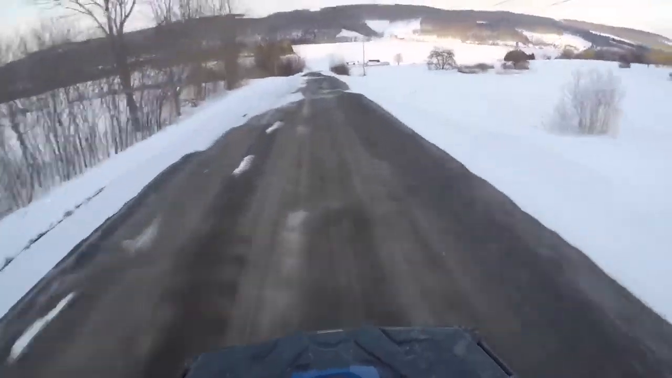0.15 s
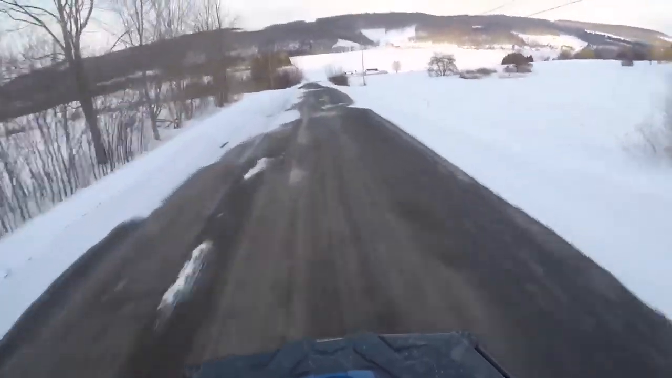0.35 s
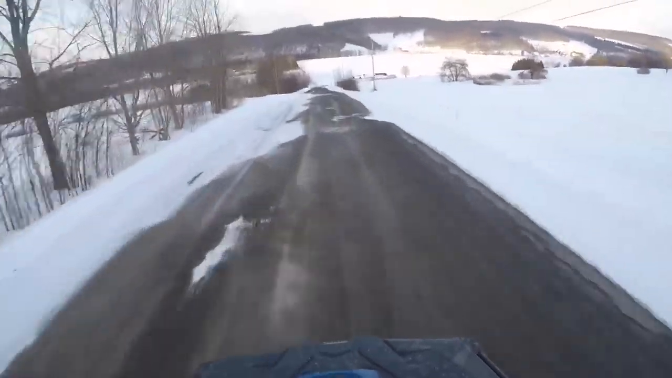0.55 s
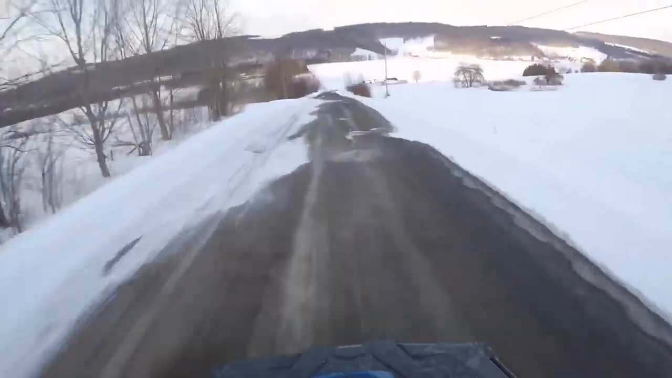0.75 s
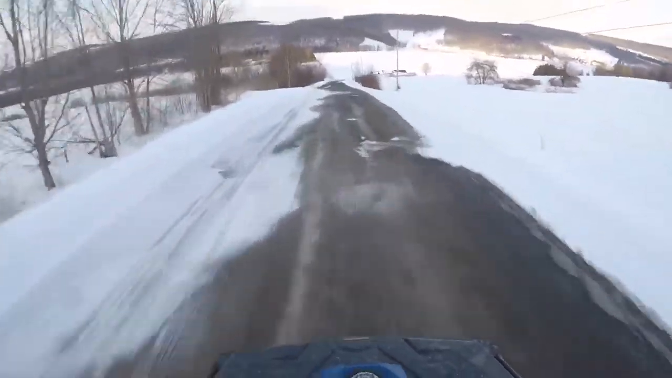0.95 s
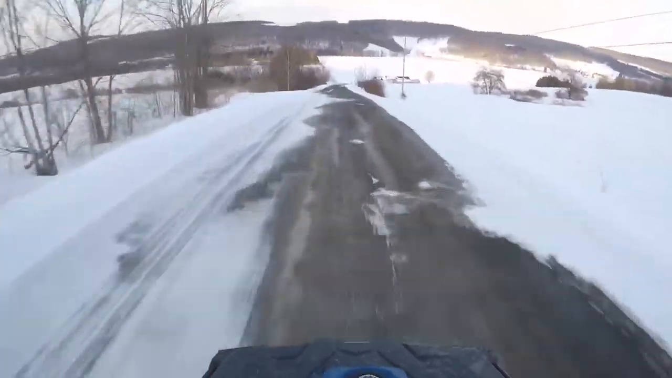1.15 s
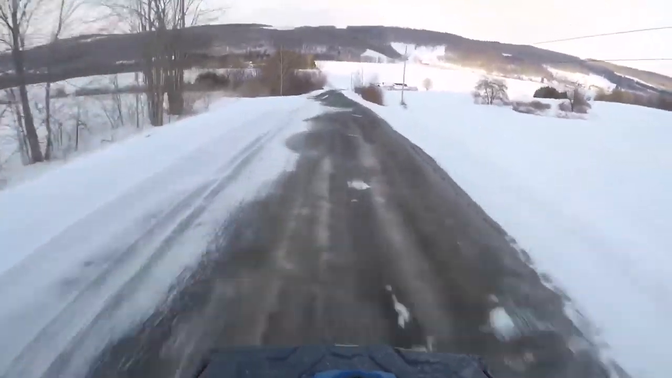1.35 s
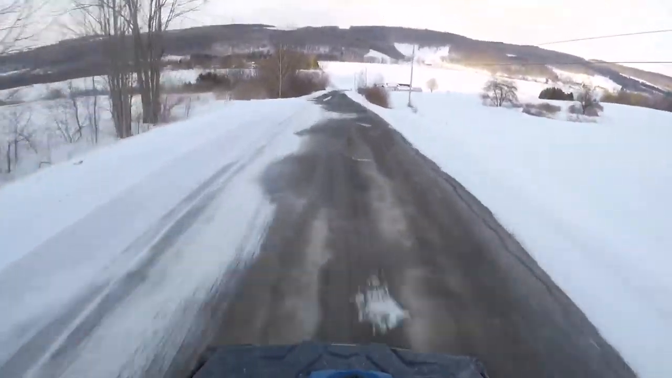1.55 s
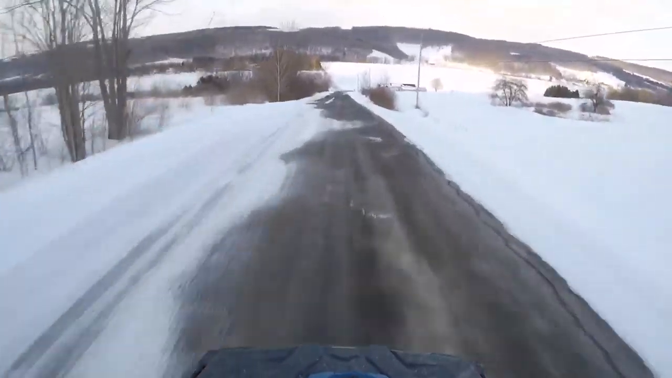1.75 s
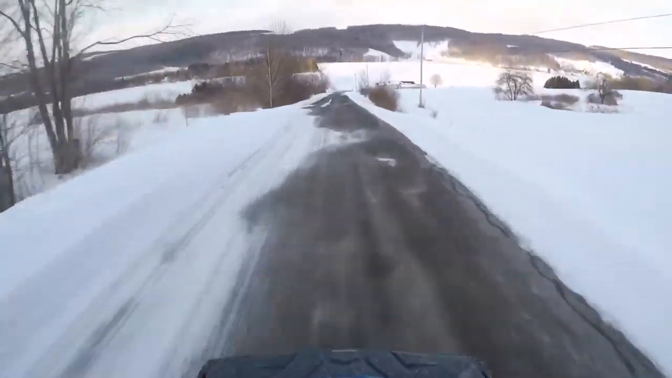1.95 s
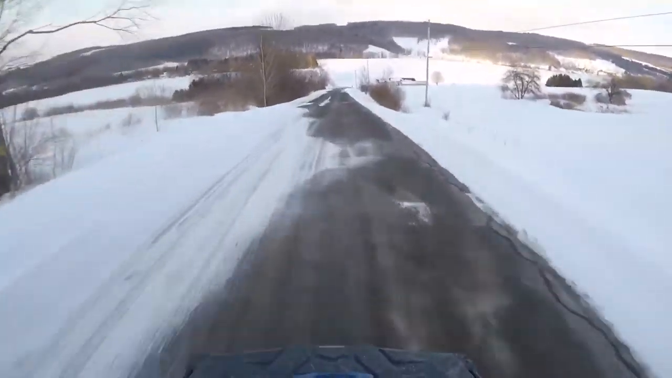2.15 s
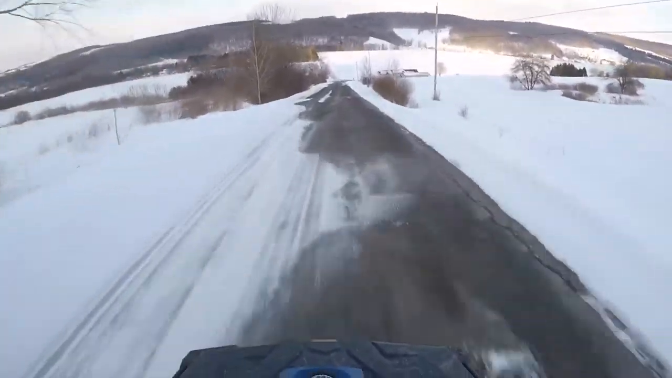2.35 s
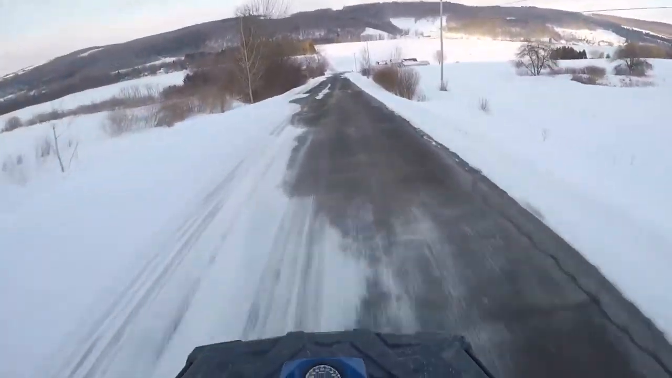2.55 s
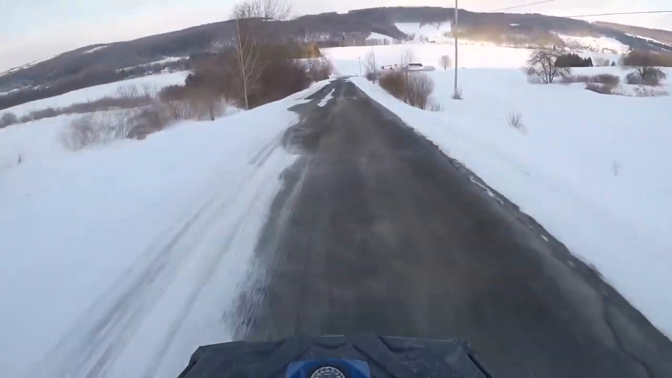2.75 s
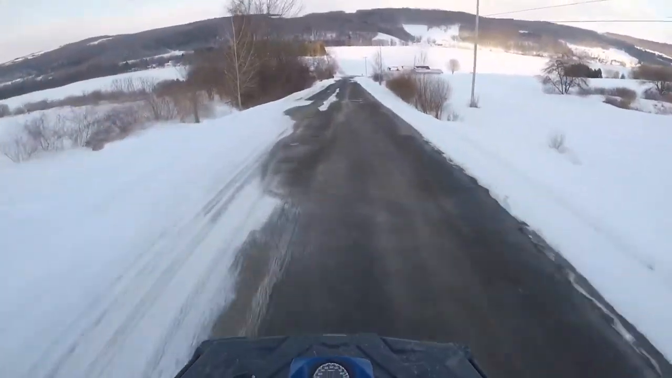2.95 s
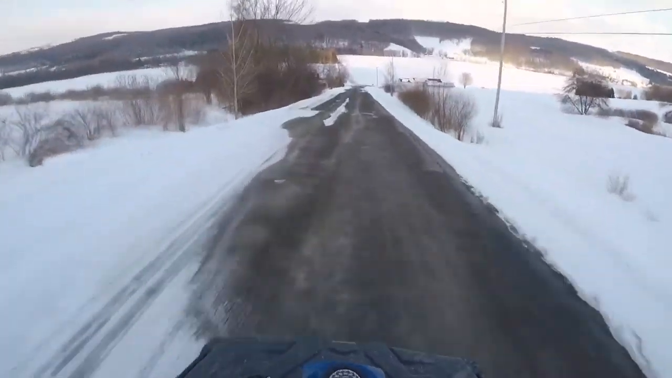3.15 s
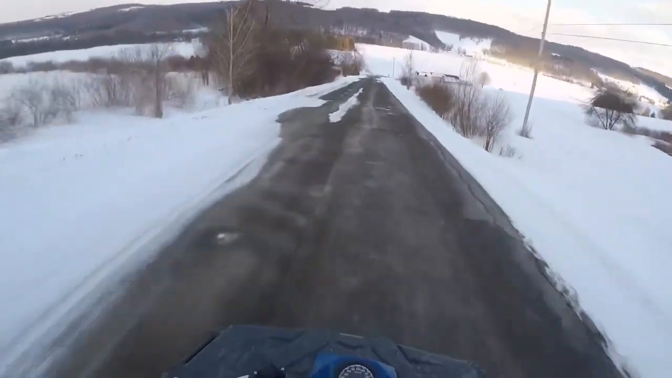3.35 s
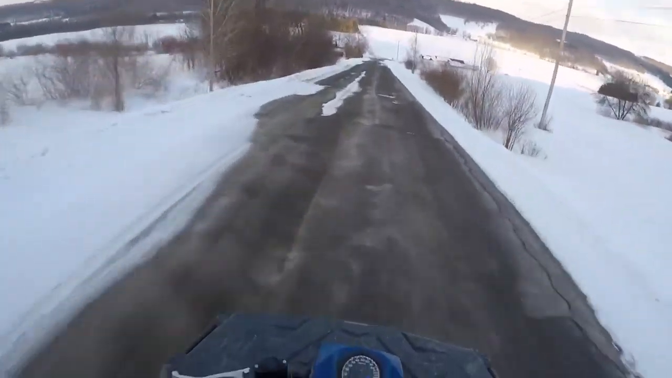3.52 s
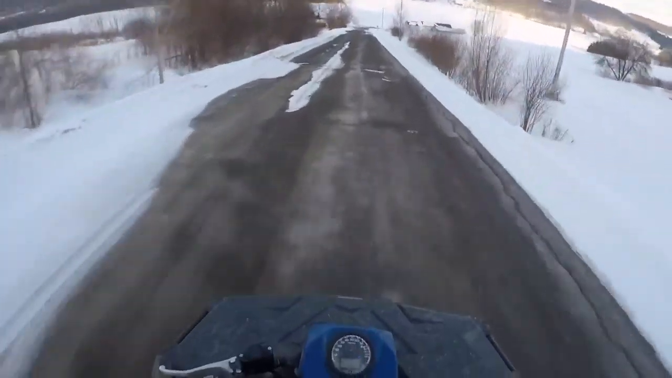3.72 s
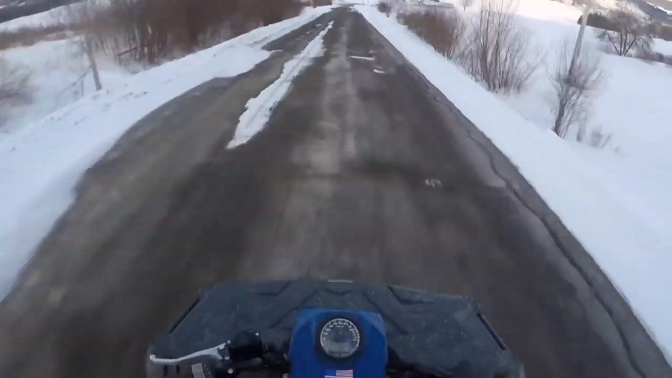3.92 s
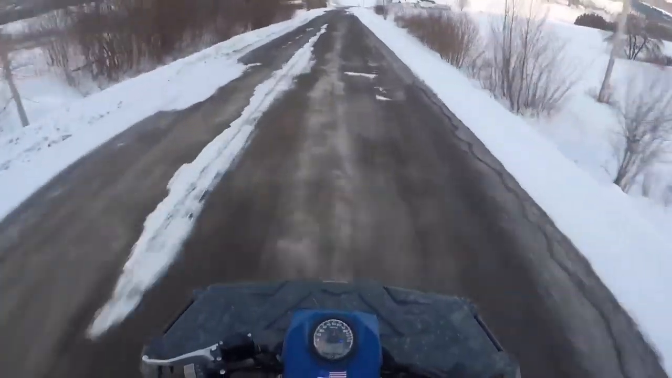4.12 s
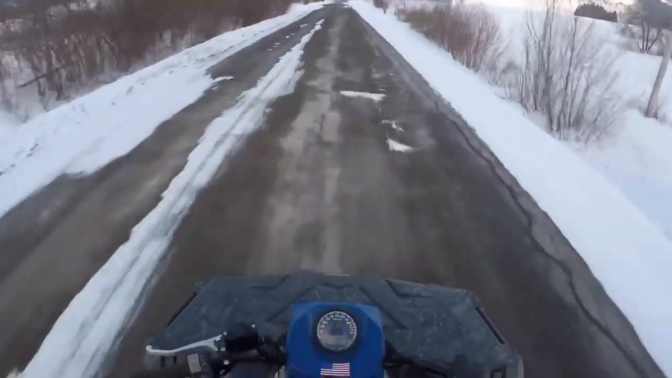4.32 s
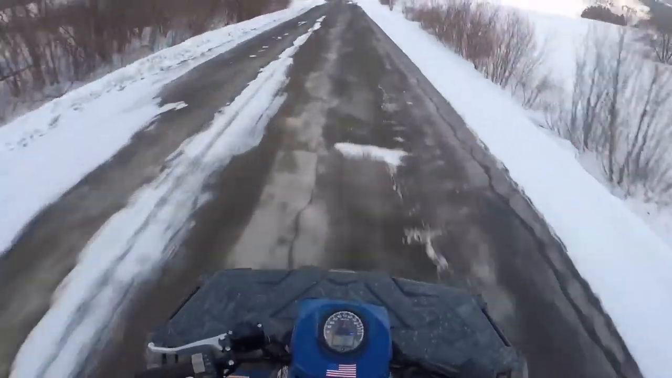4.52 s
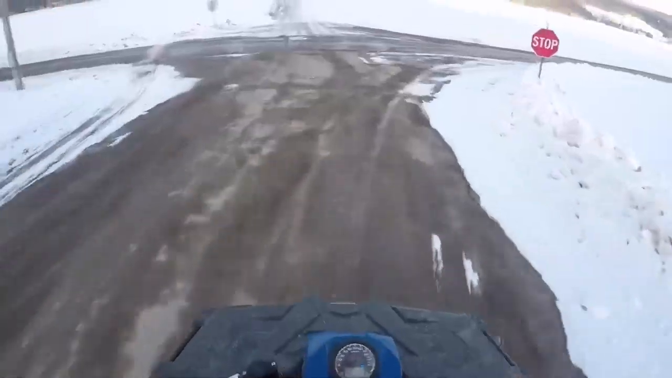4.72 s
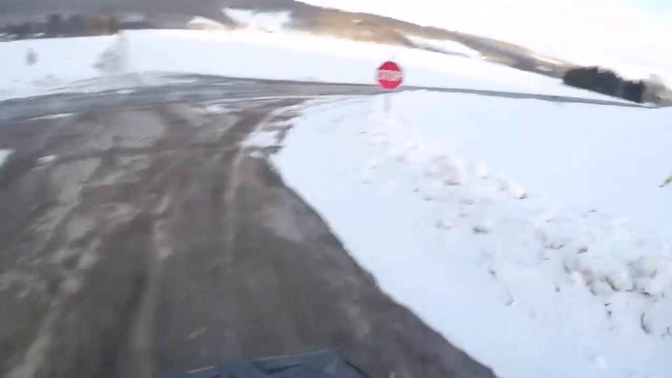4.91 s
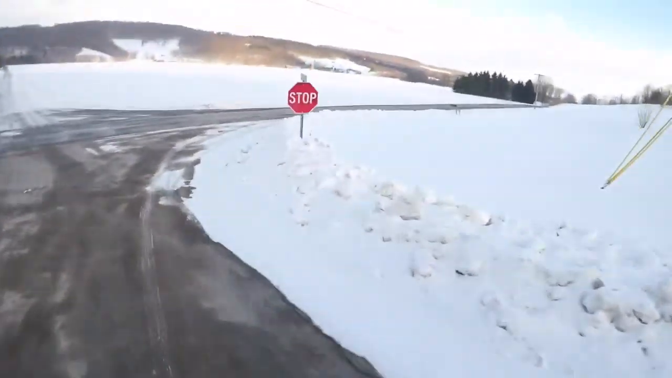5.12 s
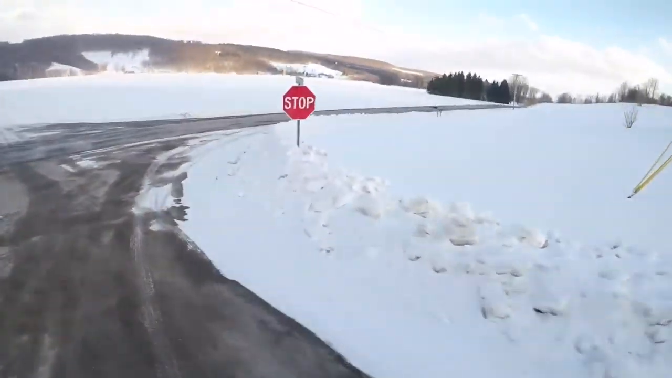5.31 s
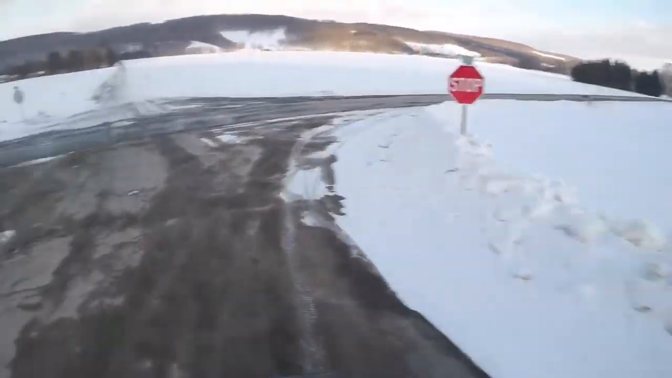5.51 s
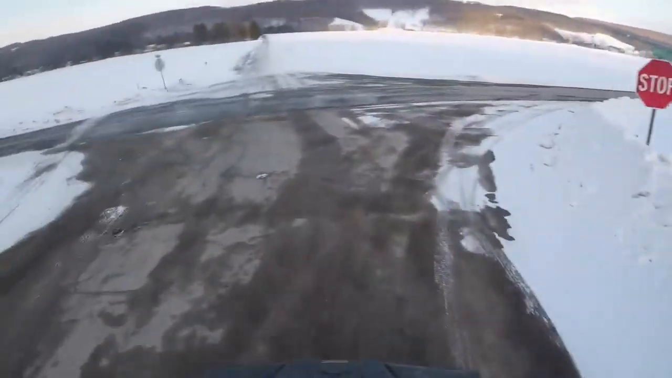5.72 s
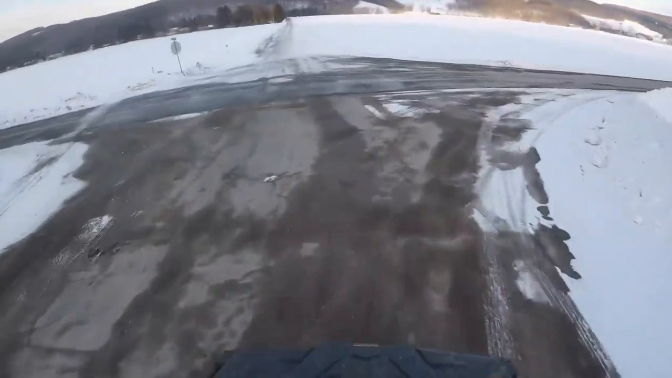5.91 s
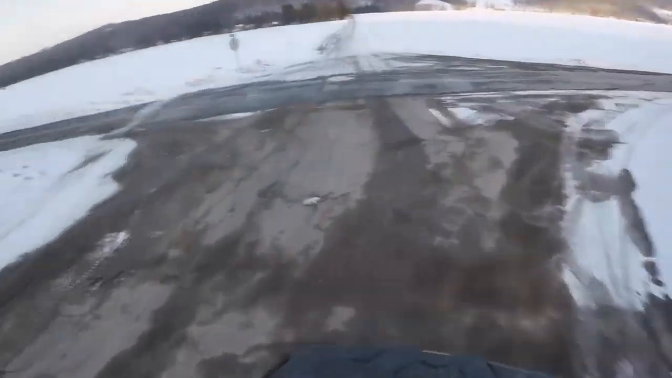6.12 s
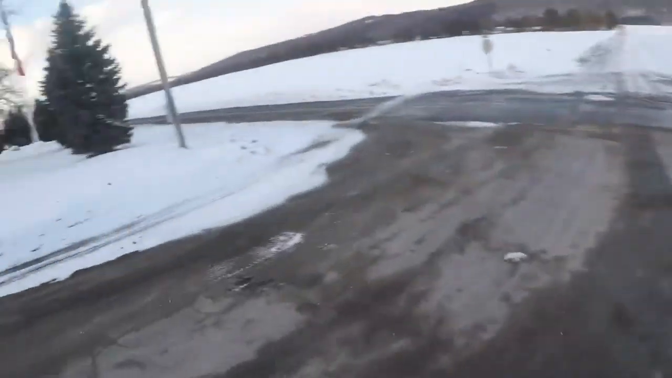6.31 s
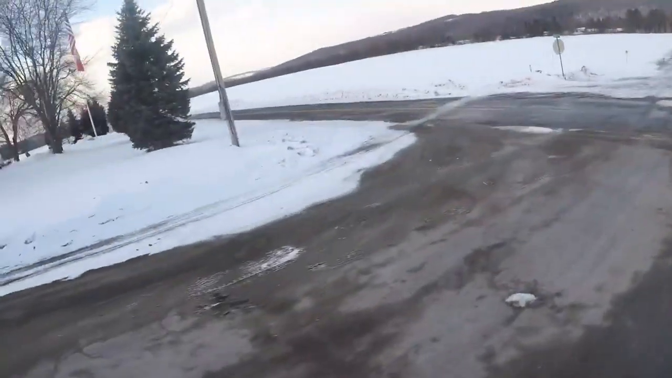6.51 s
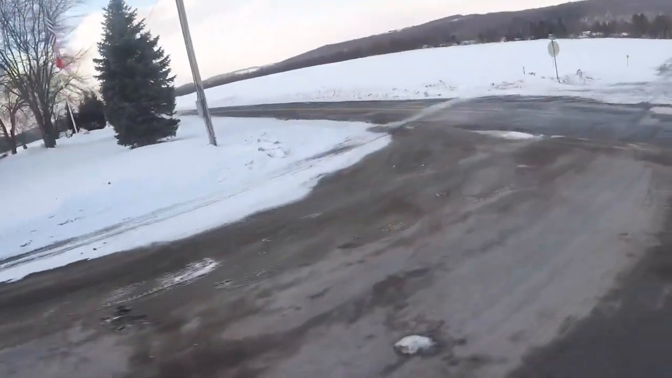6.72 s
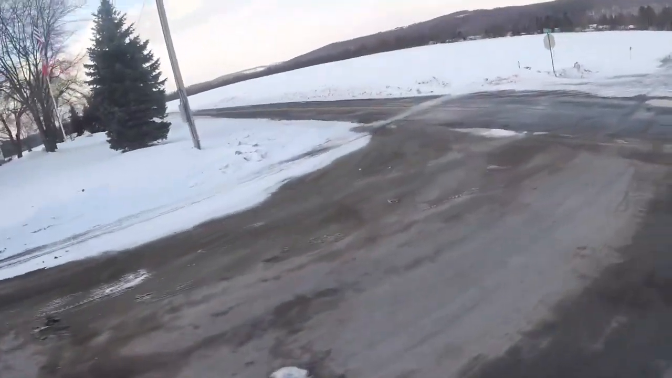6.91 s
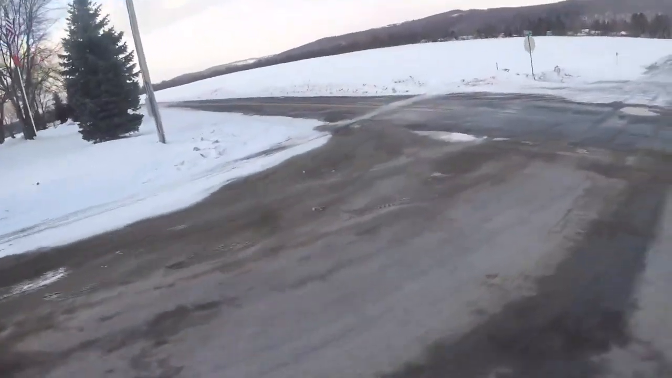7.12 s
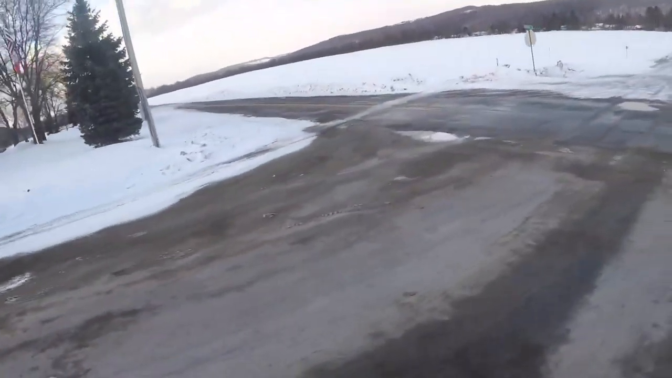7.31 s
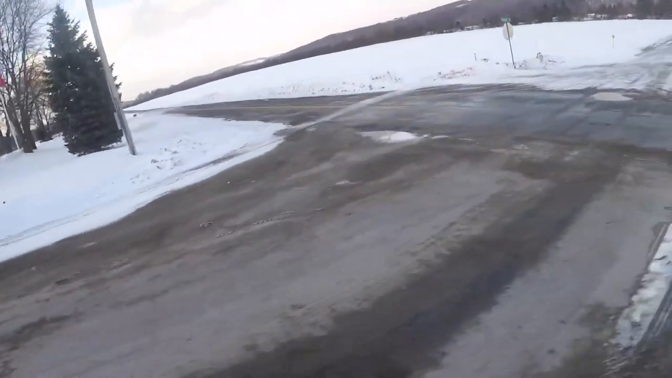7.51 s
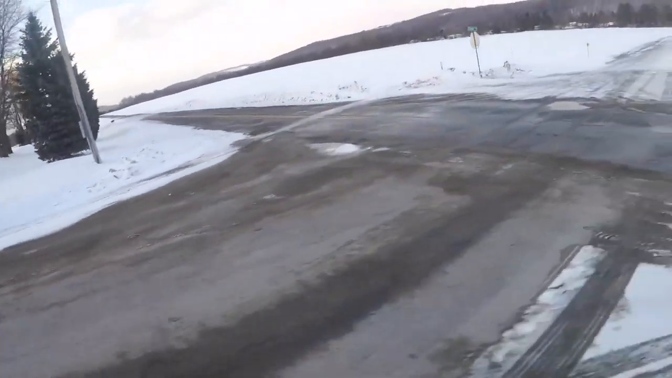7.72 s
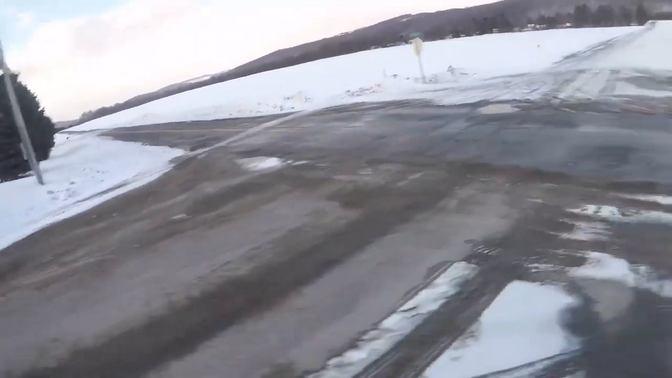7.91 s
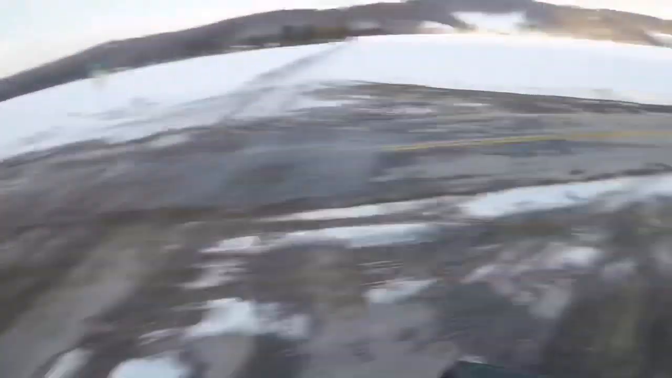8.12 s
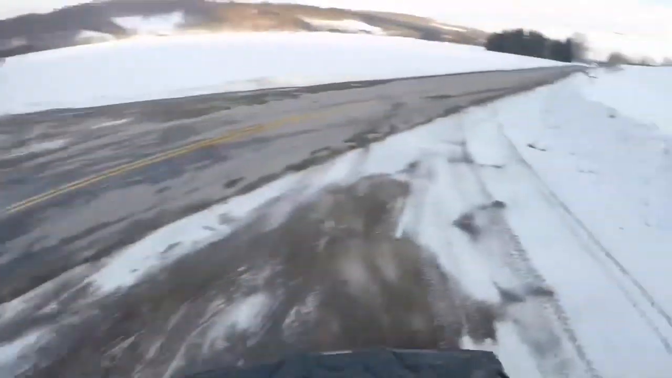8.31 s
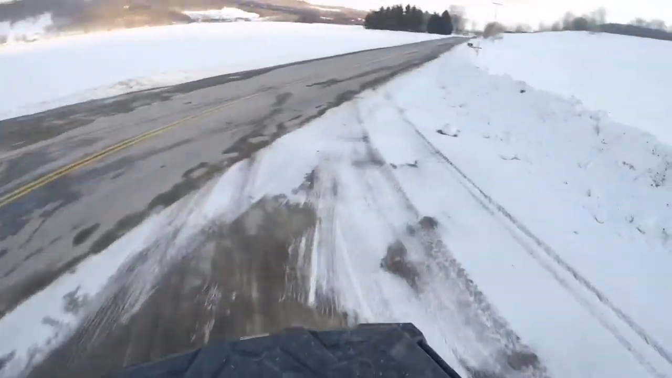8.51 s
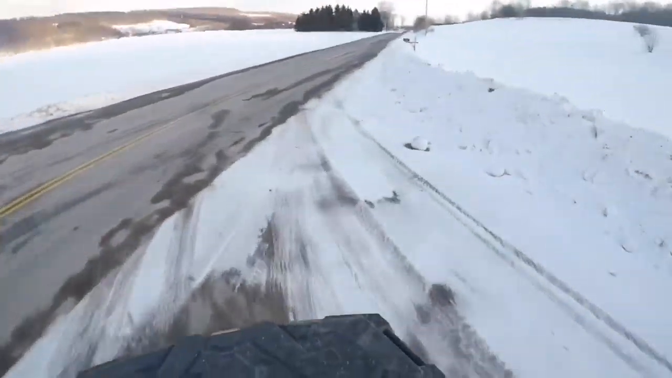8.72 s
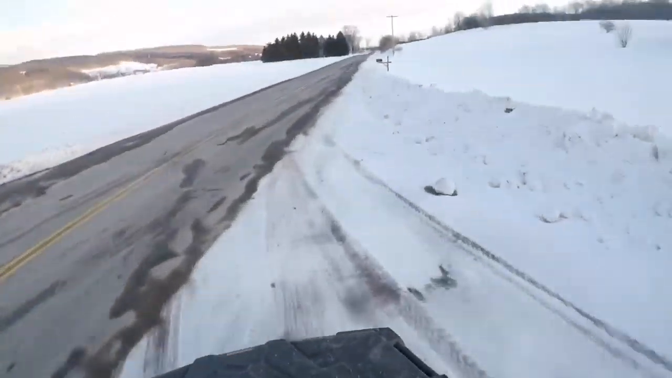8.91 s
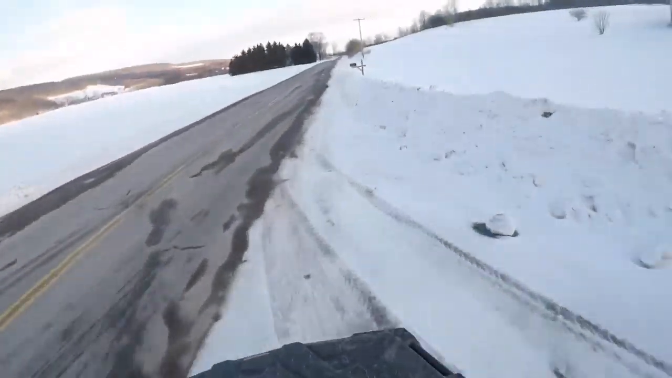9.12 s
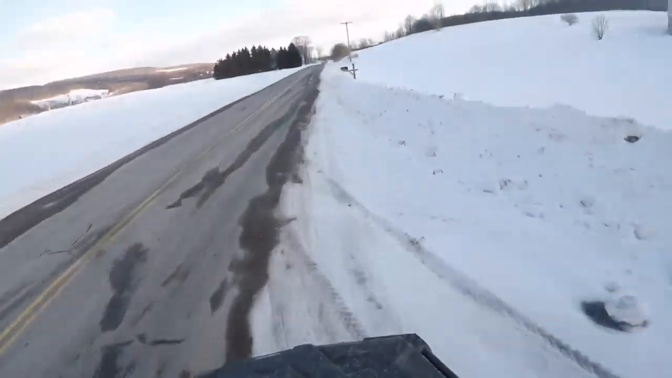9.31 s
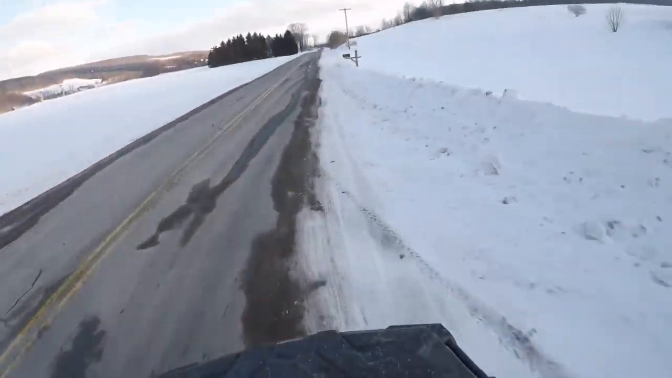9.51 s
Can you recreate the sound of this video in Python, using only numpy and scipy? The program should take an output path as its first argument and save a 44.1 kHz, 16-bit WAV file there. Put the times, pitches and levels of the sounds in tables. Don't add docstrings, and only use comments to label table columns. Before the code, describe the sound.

Wind howls and hisses over a rider's helmet above a low engine hum, then an abrupt cut to a ticking, slowing single-cylinder engine that pulls away hard.

```python
import sys
import numpy as np
from scipy import signal
from scipy.fft import rfft, irfft
from scipy.io import wavfile
from scipy.ndimage import uniform_filter1d, map_coordinates

SR = 44100
rng = np.random.default_rng(int(sys.argv[2]) if len(sys.argv) > 2 else 0)


def ratio_of_db(decibels):
    return 10 ** (np.asarray(decibels, float) / 20)


def digitize_waveform(pressure):
    field = np.atleast_2d(pressure).T
    bounded = np.clip(field, -1, 1)
    quanta = np.round(bounded * 32767).astype(np.int16)
    wavfile.write(sys.argv[1], SR, quanta)


N = 421155

# shut_db, open_db
ORDER_DB = [(0, 0), (0, 1), (1, -2), (5, 4), (-2, 1), (-1, -2), (0, 0), (2, -1), (0, 1), (0, 0), (0, 0),
            (0, 2), (0, 2), (0, 1), (0, -1), (0, -6), (0, -10), (0, -6), (0, -7), (0, -5), (0, -12),
            (0, -10)]
# (pitch_hz, width_hz, rise_db)
PIPE_SHUT = [(15, -22), (30, -13), (60, -10), (85, -9), (130, -14), (160, -24), (265, -15), (300, -21),
             (360, -23), (450, -36), (900, -70)], [(112, 30, 8), (215, 35, 13)]
# (pitch_hz, width_hz, rise_db)
PIPE_OPEN = [(15, -20), (40, -7), (80, -3), (130, -2), (175, -11), (265, -10), (345, -7), (400, -28),
             (470, -16), (620, -16), (780, -24), (900, -14), (1400, -28)], [(222, 55, 17), (325, 40, 4),
             (550, 100, 9), (690, 40, 6), (840, 40, 6), (1030, 60, 6)]


def exhaust(firing_hz, level_db, throttle, count, span):
    turns = np.cumsum(firing_hz * (1 + .0012 * wobble(20))) / SR
    lags = .7 * rng.standard_normal(count)
    drift = np.arange(N)[span] * 9 / SR
    knots = ratio_of_db(1.3 * rng.standard_normal((count, 100)))
    orders = []
    for k in range(count):
        strength = np.interp(drift, np.arange(100), knots[k])
        orders.append(strength * np.cos(2 * np.pi * (k + 1) * turns[span] - lags[k]))
    firing = np.zeros((2, N))
    firing[:, span] = ratio_of_db(ORDER_DB[:count]).T @ orders
    opening = np.clip(throttle, 0, 1)
    shut = (1 - opening) * coloured(-firing[0], *PIPE_SHUT)
    pipe = shut + opening * coloured(-firing[1], *PIPE_OPEN)
    power = np.abs(uniform_filter1d(pipe ** 2, size=SR // 6))
    return ratio_of_db(level_db) * pipe / np.sqrt(power + 1e-6), turns


# time_s, firing_hz, level_db
FAST = [(0, 52, -44), (1.2, 49, -41), (1.8, 46.8, -37), (2.5, 45, -35), (3.3, 43.4, -34), (4.64, 42.4, -33)]


def downhill_engine(span):
    firing_hz, level_db = curves(FAST)
    engine = exhaust(firing_hz, level_db, throttle=0 * firing_hz, count=6, span=span)[0]
    return coloured(engine, [(135, 0), (210, -7)])


# time_s, firing_hz, level_db
REVS = [
    [(4.66, 28.33, -29.5), (5.13, 26.54, -30.5)],
    [(5.24, 31.5, -31.5), (5.68, 29.32, -33.5), (6.3, 27.42, -29.5), (6.69, 25.4, -30.5),
     (6.98, 22.93, -34.5)],
    [(7.03, 26.99, -32.5), (7.26, 33.03, -33), (7.56, 35.52, -30.5), (7.77, 38.74, -32.5),
     (8.02, 40.1, -33.5), (8.25, 42.14, -31), (8.89, 51.52, -27), (9.19, 54.55, -28)],
    [(9.43, 44.0, -31.5), (9.47, 44.3, -33), (9.55, 46.8, -24)],
]
# time_s, opening (0-1)
THROTTLE = [(6.98, 0), (7.06, 0.54), (7.2, 0.9), (9.19, 1), (9.24, 0.08), (9.36, 0.33), (9.42, 0.95)]


def junction(span):
    firing_hz, level_db = curves(*REVS)
    pipe, turns = exhaust(firing_hz, level_db, *curves(THROTTLE), count=22, span=span)
    works = mechanical_hiss(firing_hz, turns) + valve_ticks(firing_hz, turns) + gear_whine(turns)
    return pipe + works + frame_rumble(firing_hz) + bumps()


# time_s, strain (0-1)
ROLLING = [(4.66, 0.44), (5.5, 0.16), (6.1, 0.12), (7.0, 0.16), (7.9, 0.27), (8.35, 0.47), (8.6, 0.94),
           (9.15, 0.96), (9.55, 0.99)]


def works_db(firing_hz, rest_db, per_octave_db, strain_db):
    return rest_db + per_octave_db * np.log2(firing_hz / 30) + strain_db * curves(ROLLING)[0]


# pitch_hz, level_db (per Hz)
HUM = [(300, -1), (500, -3.5), (950, -5), (1900, -11), (3400, -19), (7000, -19.5), (9000, -20.5),
       (11000, -29.5), (14500, -34), (15400, -55)]
# pitch_hz, width_hz, rise_db
TURNED = [(845, 12, 8), (1065, 68, 9), (1238, 110, 10), (1422, 220, 11), (1800, 27, -4.5), (2200, 130, 2.5),
          (2870, 360, 9.5), (3700, 200, 6), (4190, 400, 4), (5000, 400, 0), (5850, 580, 6), (6500, 430, 3),
          (7000, 200, -4), (7600, 600, 1.5)]
# time_s, hiss_rise_db, tick_rise_db
CLANKS = [(5.15, 2, 14), (5.98, 1, 7), (6.19, 2.5, -1), (7.62, -0.5, 0), (7.9, 1, 3), (9.22, .1, -1),
          (9.32, -2, -0.5), (9.46, 3.5, -5)]
CLANK_S = 0.044


def mechanical_hiss(firing_hz, turns):
    times, hiss_rise_db, _ = np.transpose(CLANKS)
    jolt_db = swells(times, hiss_rise_db, CLANK_S)
    beat = 1 + .22 * np.cos(2 * np.pi * (turns - .72))
    low, top = split(coloured(patchy(depth_db=0.5) * beat, HUM, TURNED), hz=3060)
    low_db = works_db(firing_hz, -46, 5.7, 8.55) + jolt_db
    top_db = works_db(firing_hz, -62, 5.2, 7.4) + jolt_db
    return ratio_of_db(low_db) * unit(low) + ratio_of_db(top_db) * unit(top)


def valve_ticks(firing_hz, turns):
    decay = ratio_of_db(-60 * np.arange(2000) / SR / .042)
    strikes = pulses(turns, .72, scatter_db=-1.5) + .3 * pulses(turns, 0.15, scatter_db=-1.0)
    throttle = curves(THROTTLE)[0]
    rattle = np.convolve(strikes, decay)[:N] + .15 + .15 * throttle
    peaks = [(4306, 560, 18.6), (6900, 360, 13.0), (5750, 300, 5.1), (2800, 200, 10)]
    slope = [(2000, -37), (4350, -15), (9000, -25), (12000, -54)]
    ticks = coloured(rattle * rng.standard_normal(N), slope, peaks)
    shade_db = -17 * np.clip((6.15 - np.arange(N) / SR) / .06, 0, 1)
    times, _, tick_rise_db = np.transpose(CLANKS)
    level_db = works_db(firing_hz, -58, 2.5, 4.5) + shade_db - 6 * throttle
    return ratio_of_db(level_db + swells(times, tick_rise_db, CLANK_S)) * unit(ticks)


# time_s, level_db
GEARS = [(5.3, -72), (5.45, -49), (5.8, -46), (6.05, -54), (6.45, -66)]


def gear_whine(turns):
    teeth = [(36, .8), (38, 1), (48, .5), (76, .25)]
    mesh = sum(strength * np.sin(2 * np.pi * order * turns) for order, strength in teeth)
    return ratio_of_db(curves(GEARS)[0] + 1.5 * wobble(10)) * mesh


# pitch_hz, level_db (per Hz)
RUMBLE = [(8, -20), (20, -2), (40, 0), (90, -5), (150, -12), (250, -15), (350, -18), (450, -28), (900, -60)]
# start_s, peak_db, pitch_hz, t60_s
BUMPS = [
    (5.16, -13, 29.6, 0.14),
    (5.999, -22, 27.1, 0.12),
    (6.22, -16, 80.5, 0.13),
    (6.899, -26, 24.36, 0.12),
    (7.02, -23.5, 91.5, 0.18),
    (9.297, -17, 96, 0.074),
]


def frame_rumble(firing_hz):
    t = np.arange(N) / SR
    shakes = [6 * np.exp(-np.abs(t - start) / .2) * (t > start) for start, *_ in BUMPS]
    level_db = works_db(firing_hz, -38, -3, 2.9) + np.max(shakes, axis=0)
    return ratio_of_db(level_db + 1.5 * wobble(7)) * unit(coloured(patchy(depth_db=1.5), RUMBLE))


def bumps():
    thuds = np.zeros(N + SR)
    t = np.arange(SR // 2) / SR
    for start, peak_db, hz, t60 in BUMPS:
        ring = ratio_of_db(peak_db - 7 - 60 * t / max(t60, .02)) * np.sin(2 * np.pi * hz * t)
        thuds[round(start * SR):][:len(t)] += ring
    return thuds[:N]


# time_s, strength_db
WIND = [(0, -19.5), (.05, -21.5), (.3, -19.5), (.95, -19.5), (1.07, -18.5), (1.2, -19.5), (1.62, -22),
        (1.8, -21.5), (2.25, -24), (2.8, -21.5), (3.3, -24), (3.55, -24.5), (3.9, -29.5), (4.0, -25),
        (4.3, -25), (4.6, -28.5)]


def wind_level(rest_db, growth):
    return rest_db + growth * (curves(WIND)[0] + 22)


# time_s, change_db
LAPSES = [(.24, -18), (.43, -7), (.79, 5.5), (.87, -5), (1.08, 6.5), (1.2, -4.5), (1.64, -10),
          (2.05, -12.5), (2.55, -7), (2.7, 5), (2.77, -5.5), (2.87, 4.5), (2.98, -5), (3.9, -7),
          (4.29, -11), (4.58, -6)]


def vortex_howl():
    pitch_hz = 80.5 + 2.5 * wobble(4) + 5 * wobble(20)
    howl = ratio_of_db(1.2 * wobble(14)) * np.sin(2 * np.pi * np.cumsum(pitch_hz) / SR)
    octave_hz = 168 + 4.54 * wobble(16)
    octave = ratio_of_db(-33.0 + 3.24 * wobble(14)) * np.sin(2 * np.pi * np.cumsum(octave_hz) / SR)
    level_db = wind_level(-22.5, 0.97) + swells(*np.transpose(LAPSES), 0.051)
    return ratio_of_db(level_db) * howl + octave


# pitch_hz, level_db (per Hz)
HISS = [(200, -3.5), (450, -1.5), (950, -2.5), (1900, -14), (3400, -13.5), (7000, -10.5), (9000, -21.5),
        (10500, -32.5), (14500, -45), (15400, -71)]
# pitch_hz, width_hz, rise_db
HOUSING = [(773, 112, 8.5), (844.7, 17, 10), (1085, 116, 9), (1262.6, 181, 19), (1345, 20, 8),
           (1548, 290, 16), (2176, 340, 6.5), (2766, 735, 14), (4230, 820, 10), (4960, 390, 8),
           (5300, 180, -3.5), (5734, 580, 11.5), (6650, 700, 2.5), (7060, 260, -10), (8050, 1120, 7.5),
           (9360, 550, 9)]


def housing_hiss():
    low, top = split(coloured(patchy(depth_db=0.2), HISS, HOUSING), hz=1810)
    gusts = ratio_of_db(0.36 * wobble(10) + 0.48 * wobble(28.04))
    return gusts * (ratio_of_db(wind_level(-22.5, 0.89)) * unit(low) + ratio_of_db(wind_level(-30.5, 0.77)) * unit(top))


# pitch_hz, level_db (per Hz)
BUFFET = [(10, -39), (22, -7), (45, -0.5), (70, 2), (110, -5), (200, -13), (320, -14), (600, -32),
          (1000, -56)]


def buffeting():
    return ratio_of_db(wind_level(-27.5, 0.26)) * unit(coloured(patchy(depth_db=-0.4), BUFFET))


# time_s, rise_db, half_length_s
SINGS = [(1.647, 15, 0.11), (1.94, 12.5, .06), (2.358, 8.5, 0.29), (3.15, 5, .2), (3.5, 11, 0.13)]


def rim_whistle():
    rim = coloured(patchy(depth_db=1.5), [(200, -51.5), (395, -11), (800, -60)], [(398.3, 24, 8.8)])
    return ratio_of_db(-41 + swells(*np.transpose(SINGS))) * unit(rim)


def tread():
    t = np.arange(N) / SR
    tones = sum(np.sin(2 * np.pi * hz * t) for hz in (359, 545))
    return ratio_of_db(-35.5) * np.clip((0.28 - t) / .05, 0, 1) * tones


# pitch_hz, level_db (per Hz)
PREAMP = [(1000, -40), (6000, -4), (9000, 1), (12000, 0), (15200, -10)]


def preamp_hiss():
    return ratio_of_db(-69) * unit(coloured(rng.standard_normal(N), PREAMP))


def unit(x):
    return x / np.sqrt(np.mean(x ** 2) + 1e-20)


def curves(*tables):
    times, *columns = np.transpose(np.vstack(tables))
    return [np.interp(np.arange(N) / SR, times, column) for column in columns]


def wobble(rate):
    knots = rng.standard_normal(int(N * rate / SR) + 4)
    return unit(map_coordinates(knots, [np.arange(N) * rate / SR]))


def swells(times, rises_db, half_s):
    t = np.arange(0, N, 64) / SR
    bells = np.exp(-((t[:, None] - times) / half_s) ** 2) @ rises_db
    return np.interp(np.arange(N) / SR, t, bells)


def response_db(hz, slope, peaks):
    f, level_db = np.transpose(slope)
    base = np.interp(np.log(hz + 1), np.log(f), level_db)
    return base + sum(rise / (1 + (2 * (hz - centre) / width) ** 2) for centre, width, rise in peaks)


def coloured(x, slope, peaks=()):
    size = 2 ** 14
    cepstrum = irfft(np.log(ratio_of_db(response_db(np.fft.rfftfreq(size, 1 / SR), slope, peaks))))
    cepstrum[1:size // 2] *= 2
    cepstrum[size // 2 + 1:] = 0
    return signal.fftconvolve(x, irfft(np.exp(rfft(cepstrum))))[:N]


def patchy(depth_db):
    z = signal.stft(rng.standard_normal(N + SR), nperseg=512)[2]
    field = uniform_filter1d(rng.standard_normal(z.shape), size=8, axis=0)
    field = uniform_filter1d(field, size=10, axis=1)
    return signal.istft(z * ratio_of_db(depth_db * unit(field)), nperseg=512)[1][:N]


def split(x, hz):
    low = signal.sosfiltfilt(signal.butter(2, hz, fs=SR, output="sos"), x)
    return low, x - low


def pulses(turns, offset, scatter_db):
    at = np.flatnonzero(np.diff(np.floor(turns - offset)) > 0)
    train = np.zeros(N)
    train[at] = ratio_of_db(scatter_db * rng.standard_normal(1000)[:len(at)])
    return train


def scene():
    cut_s, fade_s = 4.635, 0.032
    after = (np.arange(N) / SR - cut_s) / fade_s
    air = vortex_howl() + housing_hiss() + buffeting() + rim_whistle()
    downhill = downhill_engine(after < 10) + air + tread()
    preamp = preamp_hiss()
    before_cut = (downhill + preamp) * np.clip(-after, 0, 1)
    after_cut = (junction(after > -10) + preamp) * np.clip(after, 0, 1)
    return (before_cut + after_cut)[None]


# pitch_hz, level_db
MICROPHONE = [(20, 0), (10500, 0), (11500, -3), (13500, -8), (14500, -5), (15200, -10)]


def roll_off(x):
    return signal.sosfilt(signal.butter(12, 15250, fs=SR, output="sos"), x)


def record(dry):
    mix = coloured(dry[0], MICROPHONE)[None]
    return roll_off(mix)


dry = scene()
out = record(dry)
digitize_waveform(out)
```